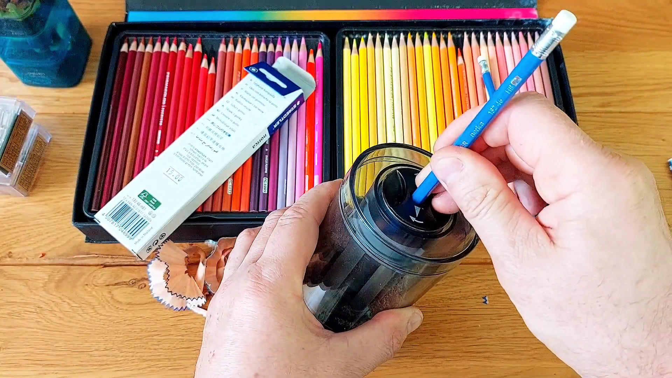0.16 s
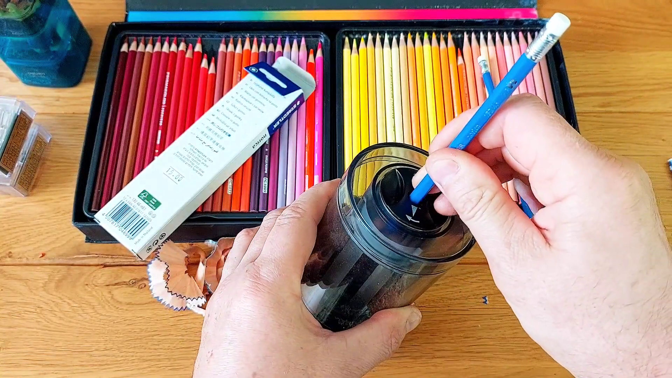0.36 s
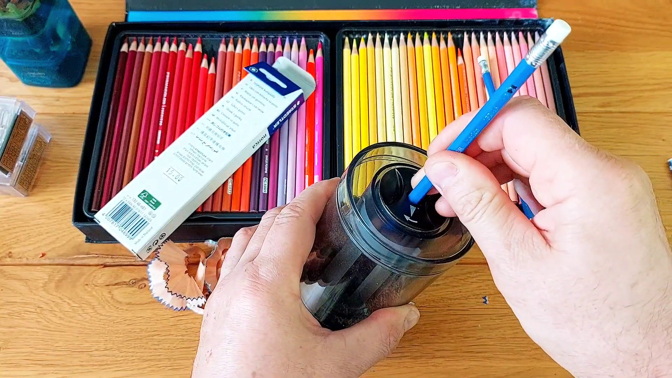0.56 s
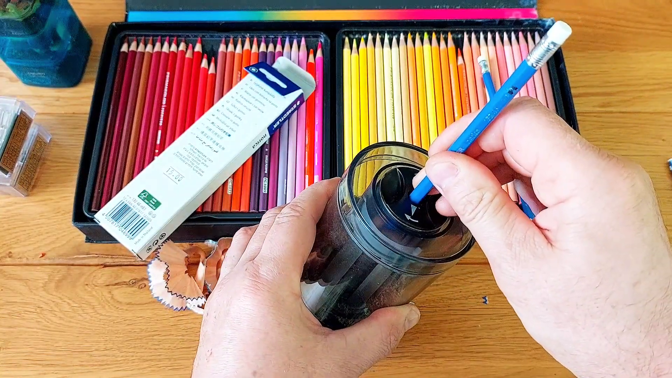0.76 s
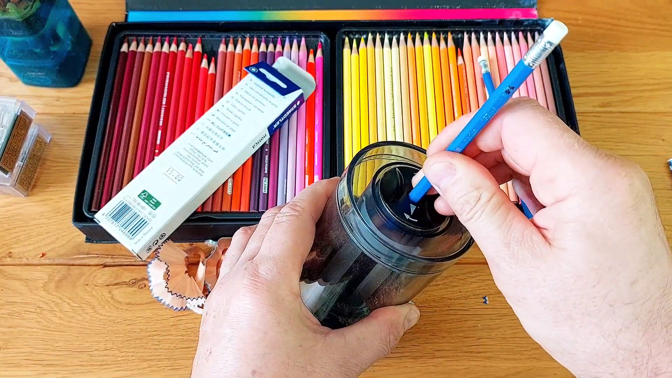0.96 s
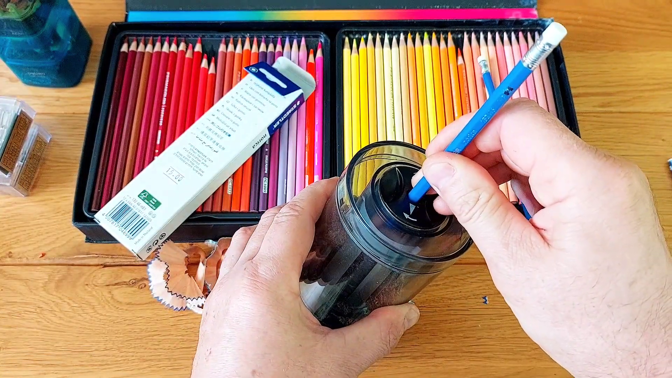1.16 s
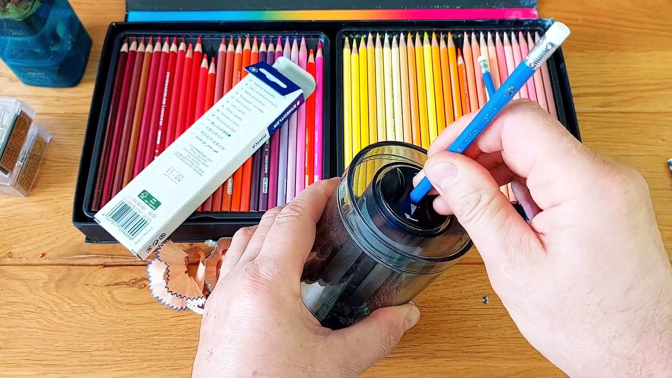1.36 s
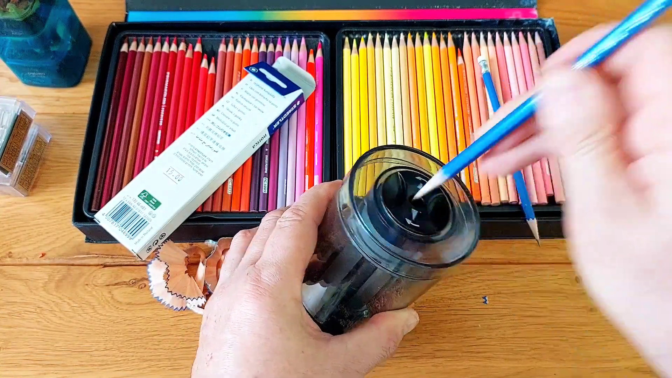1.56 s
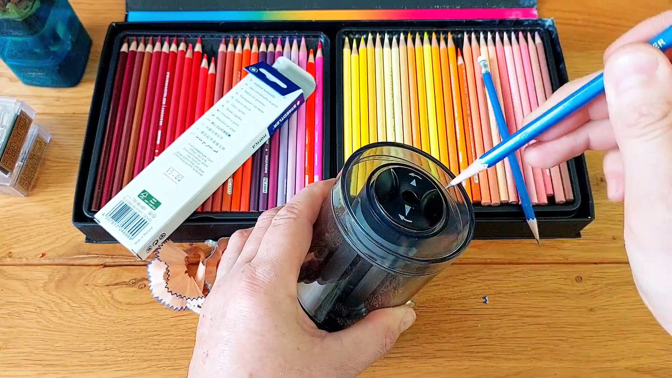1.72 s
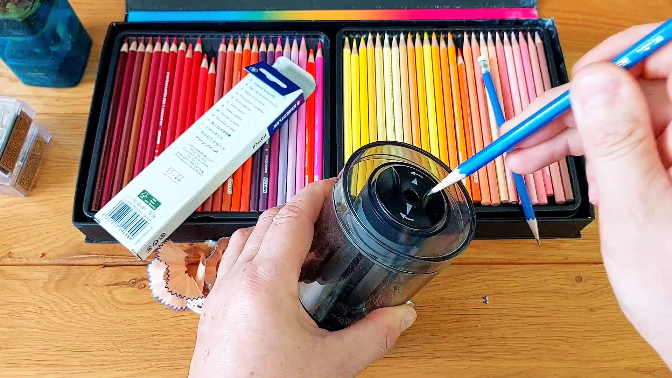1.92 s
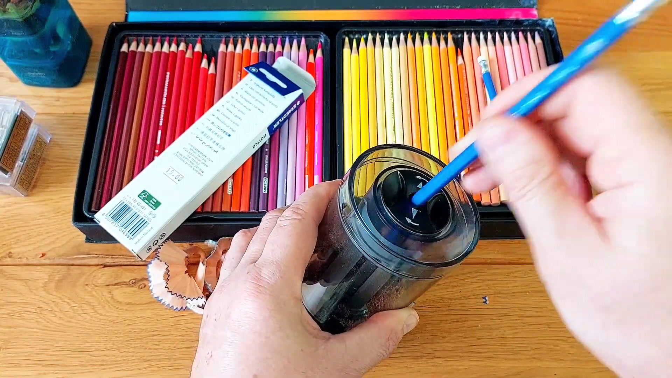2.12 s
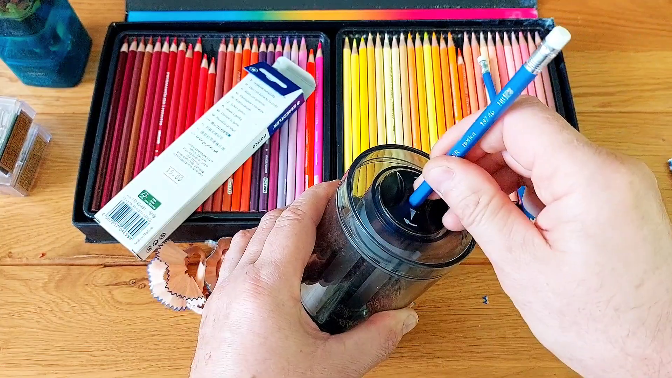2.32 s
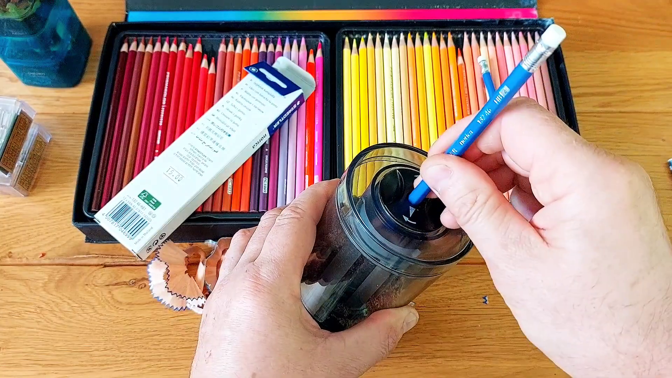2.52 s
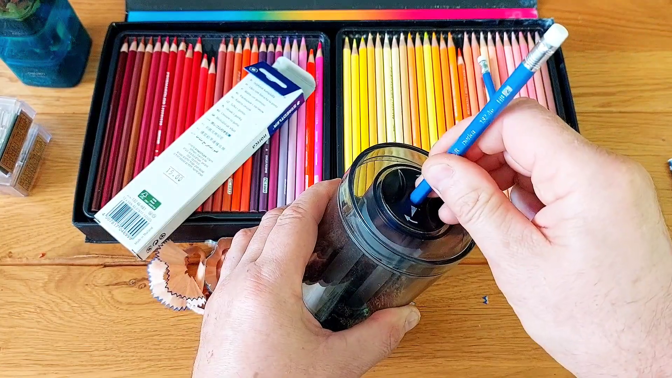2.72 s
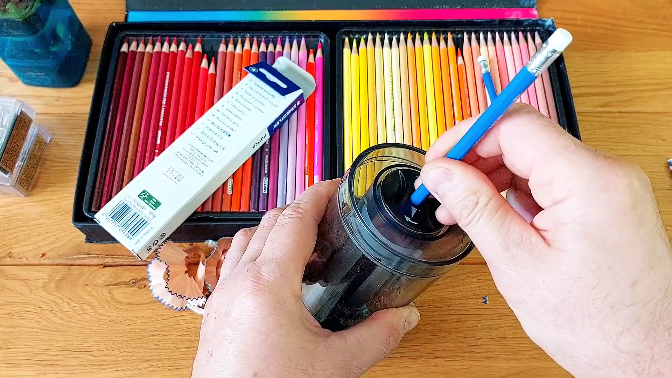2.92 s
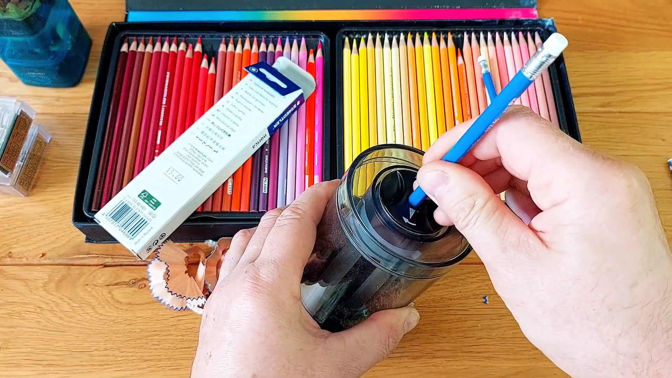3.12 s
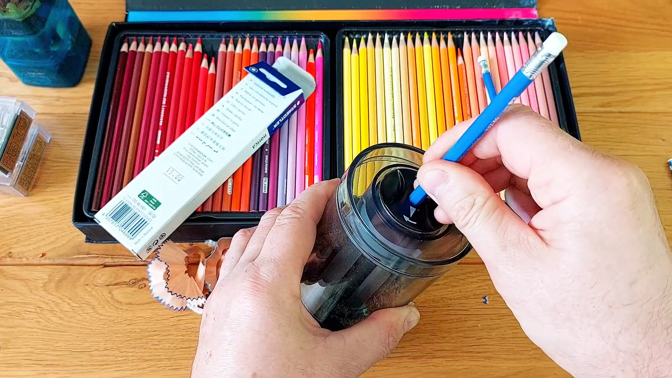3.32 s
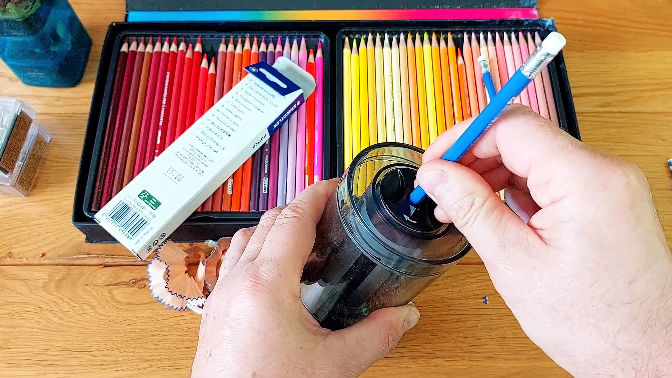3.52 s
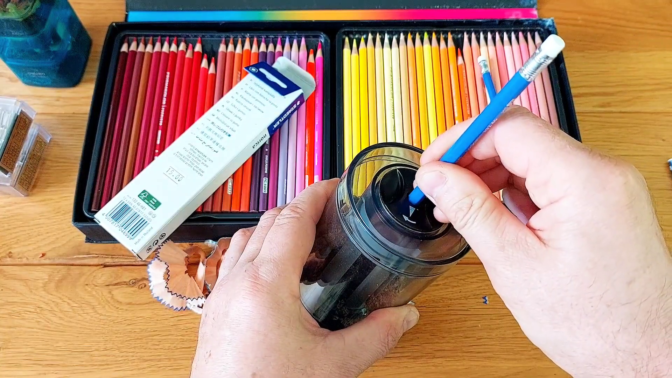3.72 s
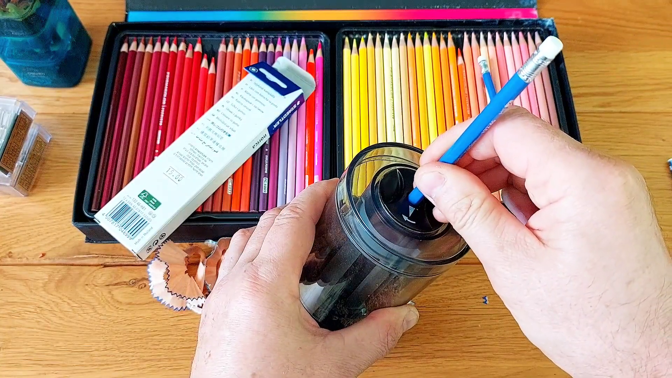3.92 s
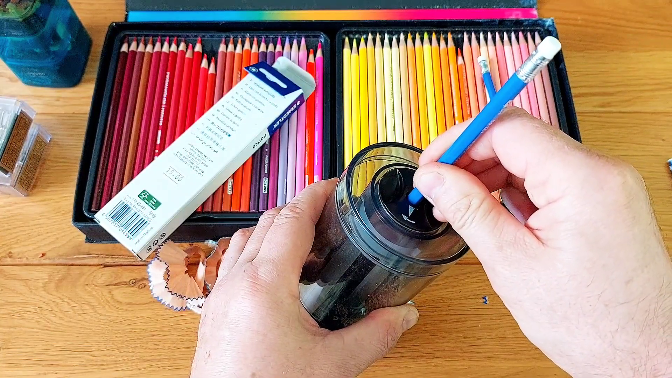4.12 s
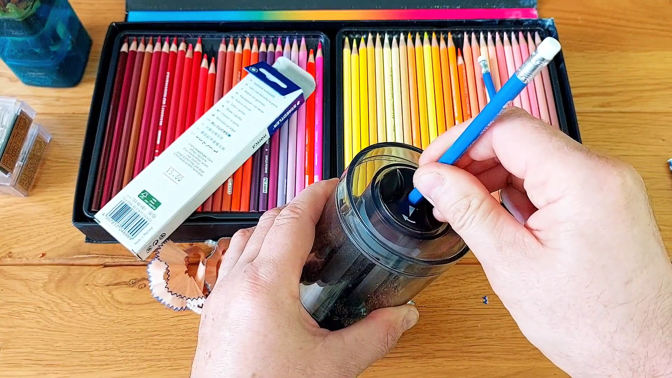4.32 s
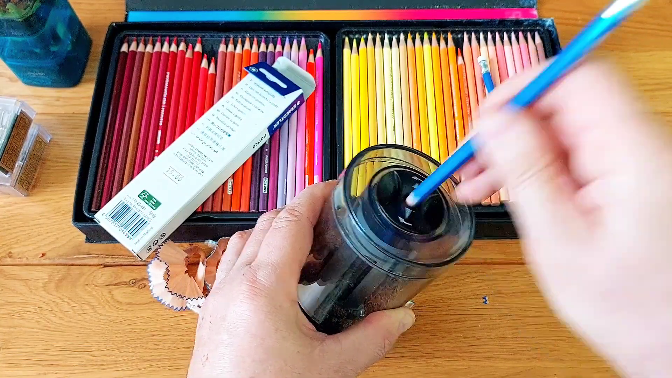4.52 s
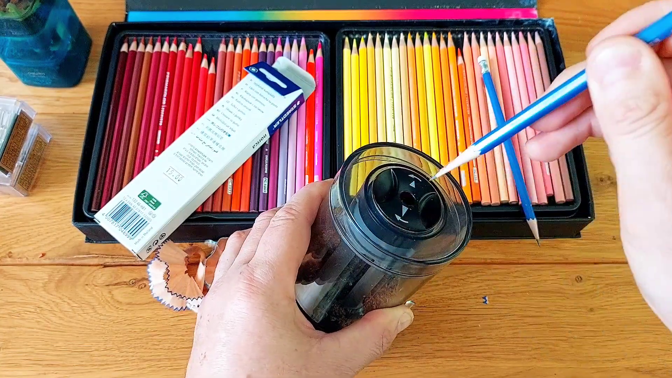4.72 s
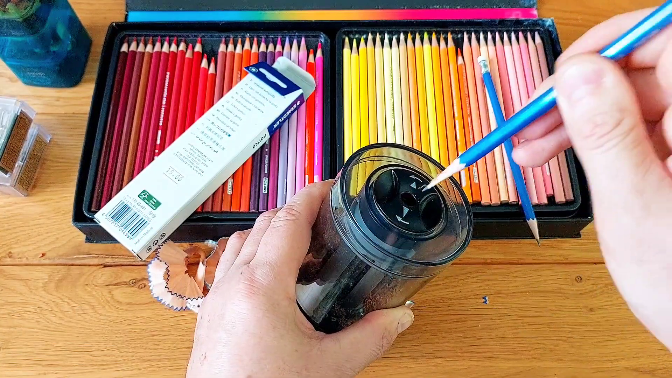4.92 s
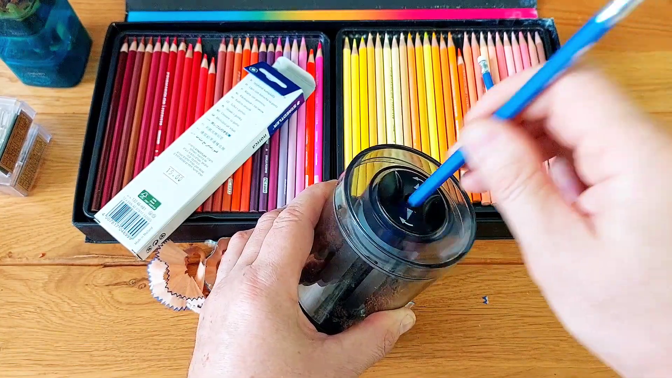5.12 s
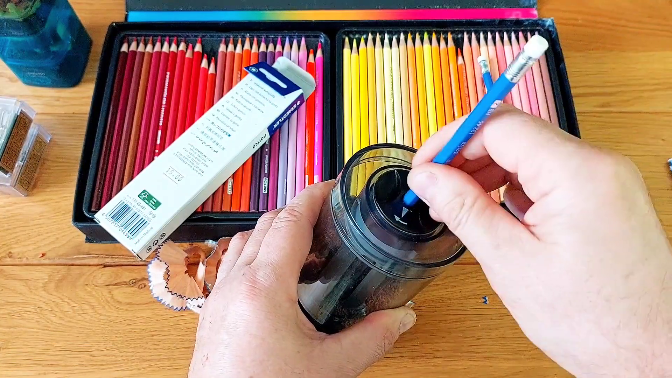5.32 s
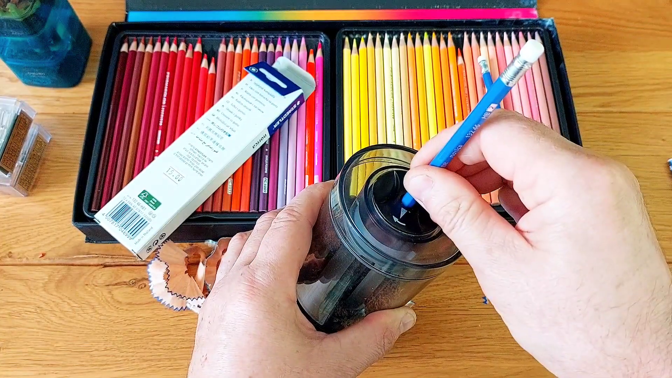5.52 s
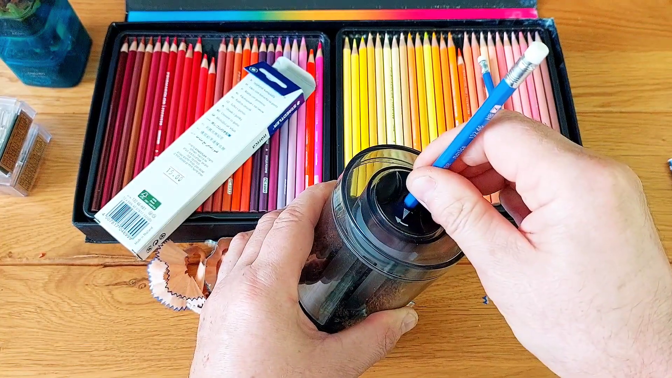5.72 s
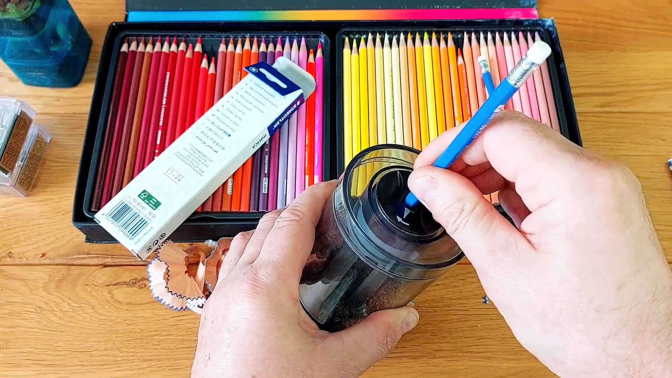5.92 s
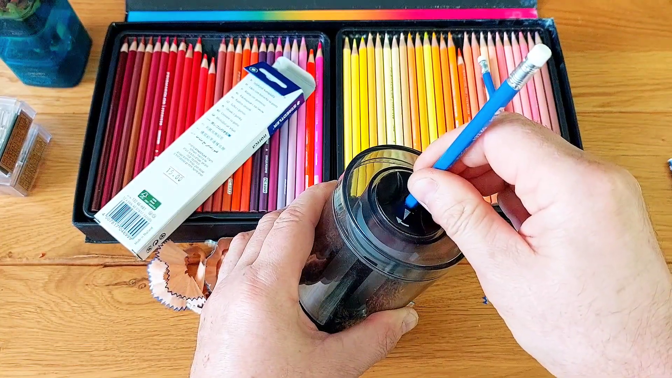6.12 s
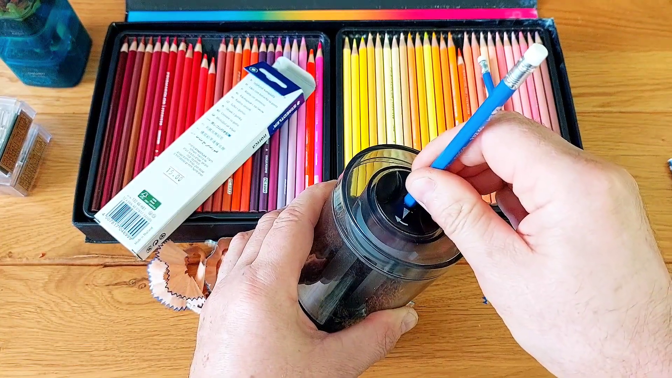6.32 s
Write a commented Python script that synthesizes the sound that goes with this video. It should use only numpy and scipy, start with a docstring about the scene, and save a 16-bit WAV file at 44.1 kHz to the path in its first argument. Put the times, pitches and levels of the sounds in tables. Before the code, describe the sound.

Close up, a motorised pencil sharpener grinds, sags and rattles on a table, stops twice for clicking pencil changes, then grinds again.

```python
"""A small electric sharpener on a wooden table, close to the microphones, takes three pencils.
Its gears whine and sag under load, the cutter rasps the wood once a turn, the housing rattles on the table.
Between the runs, pencils click and scrape in the opening: noise bursts and random slips through resonances.
The tabletop throws back bright copies, a small room answers with a diffuse tail, and a low rumble lies under it."""
import sys
import numpy as np
from scipy import signal
from scipy.fft import rfft, irfft, next_fast_len
from scipy.io import wavfile
from scipy.ndimage import uniform_filter1d, map_coordinates

SR = 44100
rng = np.random.default_rng(int(sys.argv[2]) if len(sys.argv) > 2 else 0)


def file_out(sig):
    """Save sig as 16-bit WAV at sys.argv[1]."""
    # one column per channel
    cols = np.atleast_2d(sig).T
    # limit, then scale
    lim = np.clip(cols, -1, 1)
    pcm = np.round(lim * 32767).astype(np.int16)
    wavfile.write(sys.argv[1], SR, pcm)


N = 284886
TOP_HZ = 15900  # band limit

# one run per pencil: motor on t/s, motor off t/s, unloaded gear tooth rate f/Hz, cutter passes its tight side t/s
RUNS = [(-.3, 1.071, 1980, .546), (2.715, 4.178, 2024, 3.523), (5.872, 7, 1990, 6.324)]
# the hand pushes the pencil deeper: t/s, speed lost/share, half length/s, extra rattle level/dB
PUSHES = [(.292, .072, .038, 1.5), (0.464, .052, .025, 1.5), (0.621, .079, .098, 1.5),
          (.914, .084, .098, 2.5), (2.968, .115, .052, 3), (3.209, .109, .063, 3.5), (3.453, .056, .036, 3),
          (3.516, .059, .07, 0.5), (3.784, .111, .039, 2), (3.881, .043, .056, 1), (4.028, .057, .022, 0),
          (4.102, .127, .063, 2), (5.932, .069, .025, 0.5), (6.057, .24, .062, 8), (6.15, .064, .053, -1),
          (6.335, 0.026, 0.019, -2.5), (6.408, .104, .06, 4.5)]
# pencil touching the sharpener: t/s, then click, knock and bright tick peak level/dB, each before its lift
CONTACTS = [(1.406, -52, -66, -57), (1.422, -36.5, -38.5, -60), (1.479, -29.5, -38, -58),
            (1.488, -27.5, -36, -52), (1.544, -34.5, -46, -42.5), (1.559, -40, -59, -53),
            (1.571, -31.5, -63, -34.5), (1.875, -68, -88, -66), (2.016, -64, -64, -76),
            (2.172, -42, -69, -71), (2.186, -36.5, -41.5, -75), (2.265, -28, -35.5, -55.5),
            (2.302, -24.5, -36, -49), (2.315, -32.5, -36, -72), (2.441, -61, -60, -57),
            (2.595, -57, -66, -65), (4.336, -28, -54, -51), (4.42, -41, -57, -56), (4.449, -38.5, -40, -76),
            (4.486, -31.5, -49, -52), (4.532, -22, -40.5, -43), (4.545, -19, -25.5, -39.5),
            (4.604, -25.5, -40.5, -42), (5.163, -51, -71, -86), (5.193, -32.5, -49, -64),
            (5.257, -29, -45, -49.5), (5.333, -42, -49, -82), (5.385, -53, -59, -60),
            (5.753, -58.5, -67.5, -66)]
# lingering ring of the cup and blade: f/Hz, width/Hz, relative level/dB
HOLLOW = [(208, 28, -3.5), (824, 30, 3), (1590, 18, -0.5), (7900, 48, 0.5)]
# struck plastic: f/Hz, relative level/dB per Hz
CLICK = [(200, -20.5), (620, 2), (850, 4.5), (1300, -3.5), (1650, 2), (2050, 0.5), (2350, 0.5),
         (2650, -2.5), (3100, -1.5), (3700, -3.5), (6000, -9.5), (9000, -32), (16000, -50)]
# dull knock: f/Hz, relative level/dB per Hz
KNOCK = [(40, -29.5), (130, -10.5), (200, -4), (260, -4.5), (350, -9.5), (500, -20.5), (1500, -42)]
# sharp tick: f/Hz, relative level/dB per Hz
TICK = [(2000, -37), (6500, -2.5), (7500, 2), (8800, -10.5), (12000, -5.5), (16000, -10)]


def amp(db):
    """Decibels to gain."""
    return 10 ** (np.asarray(db) / 20)


def unit(x):
    """Scaled to rms 1."""
    return x / np.sqrt(np.mean(x ** 2) + 1e-20)


def along(points, hz):
    """(Hz, value) points read on a log frequency axis."""
    f, v = np.transpose(points)
    return np.interp(np.log(hz + 1), np.log(f + 1), v)


def wobble(rate):
    """A smooth random curve, rate knots a second."""
    knots = rng.standard_normal(int(N * rate / SR) + 4)
    return map_coordinates(knots, [np.arange(N) * rate / SR])


def filtered(x, response):
    """x times a complex response of frequency."""
    n = x.shape[-1]
    m = next_fast_len(n + SR // 4, True)
    return irfft(rfft(x, m) * response(np.fft.rfftfreq(m, 1 / SR)), m)[..., :n]


def coloured(x, spectrum, size=4096):
    """x through a causal, minimum-phase filter of unit energy with the given spectrum."""
    cepstrum = irfft(np.log(amp(along(spectrum, np.fft.rfftfreq(size, 1 / SR)))))
    # folding the cepstrum forward puts the energy as early as it can be
    cepstrum[1:size // 2] *= 2
    cepstrum[size // 2 + 1:] = 0
    ring = irfft(np.exp(rfft(cepstrum)))
    return signal.fftconvolve(x, ring[None] / np.linalg.norm(ring), axes=1)[:, :x.shape[1]]


def resonate(x, modes):
    """x through (Hz, width Hz, dB) resonances of alternating sign."""
    def response(f):
        total = 0
        for k, (centre, width, db) in enumerate(modes):
            damping = 1j * f * width
            total = total + (-1) ** k * amp(db) * damping / (centre * centre - f * f + damping)
        return total
    return filtered(x, response)


def grains(rate, scatter_db):
    """Random tiny impulses of uneven size, rate a second, on two paths, rms 1."""
    chance = rng.random(N)
    size = amp(scatter_db * rng.standard_normal(N))
    return unit((chance < rate / SR) * size * rng.standard_normal((2, N)))


def push(t, s, length_s):
    """The bell-shaped swell of one push."""
    return np.exp(-((t - s) / length_s) ** 2)


def motor():
    """Gear tooth rate in Hz: spin-up, a sag at every push and every orbit, then coasting down."""
    # the motor catches short of its speed by this share, spins up, and coasts down after the switch opens
    start_lack, spin_up_s, spin_down_s = .45, .086, .135
    # the cutter orbits the pencil about twelve times a second and drags once on every orbit
    teeth_per_orbit, orbit_sag = 159.3, .032
    t = np.arange(N) / SR
    load = sum(share * push(t, s, length_s) for s, share, length_s, _ in PUSHES)
    mesh_hz = np.zeros(N)
    for on, off, free_hz, tight_s in RUNS:
        spin_up = 1 - start_lack * np.exp(-(np.maximum(t - on, 0) / spin_up_s) ** 2)
        spin_down = np.exp(-np.maximum(t - off, 0) / spin_down_s)
        hz = free_hz * spin_up * spin_down * (1 - load)
        orbits = np.cumsum(hz) / SR / teeth_per_orbit
        drag = orbit_sag * np.cos(2 * np.pi * (orbits - np.interp(tight_s, t, orbits)))
        mesh_hz = np.where(t >= on, hz * (1 - drag), mesh_hz)
    return np.maximum(mesh_hz, 1)


def running(attack_s, release_s, coast_db):
    """Gain of the runs: attack, hold, a quick release as the pencil leaves, and a quiet spell of coasting."""
    # the emptied cutter spins on for a moment, then fades
    coast_s, coast_db_per_s = 0.14, 252
    t = np.arange(N) / SR
    total = np.zeros(N)
    for on, off, *_ in RUNS:
        since_on = np.maximum(t - on, 0)
        since_off = np.maximum(t - off, 0)
        attack = 1 - np.exp(-(since_on / attack_s) ** 1.67)
        release = np.exp(-(since_off / release_s) ** 3)
        coast = amp(coast_db - coast_db_per_s * np.maximum(since_off - coast_s, 0))
        total += attack * np.maximum(release, coast)
    return total


def rasp(turns, bite_db, flutter_db, ring_db):
    """Wood fibres snap in a clump at each pass of the cutter; the steel blade rings with each bite."""
    # plastic shell and shavings cup: f/Hz, relative level/dB per Hz
    shell = [(300, -25), (800, -8), (1250, -9.5), (1600, -2), (2000, -3.5), (2500, -1), (3200, -11),
             (3850, -4), (4600, -5), (5100, -5.5), (5650, 0.5), (6900, -13.5), (7600, -10), (8500, -16),
             (10500, -13), (15500, -17)]
    # steel blade: f/Hz, relative level/dB per Hz
    blade = [(1000, -46.5), (5100, -19.5), (5850, 4), (6800, -19), (7600, -1.5), (8400, -21),
             (15000, -25.5)]
    bite = np.cos(2 * np.pi * turns + .8 * wobble(20))
    flutter = amp(flutter_db * wobble(200))
    snaps = flutter * amp(bite_db * bite) * grains(rate=22000, scatter_db=0.76)
    strikes = flutter * amp(6.6 * bite) * grains(rate=13000, scatter_db=2.5)
    wood = coloured(unit(snaps), shell)
    steel = coloured(unit(strikes), blade)
    return unit(wood + amp(ring_db) * steel)


def partial(phase, db, waver_db):
    """One rough gear tone, reaching the two paths a quarter cycle apart."""
    swell = amp(db + waver_db * wobble(60) + 1.5 * wobble(300))
    return swell * np.array([np.sin(phase + .6 * wobble(45) + lag) for lag in (0, np.pi / 2)])


def whine(teeth, mesh_hz, jitter, waver_db, beat_db):
    """Meshing teeth: harmonics with uneven timing, which flare as they cross the gearbox's resonances."""
    # how strongly the gearbox radiates a tone: f/Hz, relative level/dB
    gearbox = [(1050, -38), (1250, -5), (1550, -6.5), (1780, -13), (2040, -6), (2350, -14.5), (2900, -4.5),
               (3300, -24.5), (3650, -11.5), (4020, -4), (4450, -26), (5200, -14.5), (5600, -9.5),
               (6300, -19), (8200, -25.5)]
    phase = 2 * np.pi * teeth + jitter * wobble(220)  # jitter in radians
    tone = sum(partial(k * phase, along(gearbox, k * mesh_hz), waver_db) for k in range(1, 5))
    # off-centre gears add weaker tones just under the tooth rate
    for ratio in (5 / 6, 9 / 10):
        tone += partial(ratio * phase, along(gearbox, mesh_hz) + beat_db, waver_db)
    return tone


def rattle(turns, throb_db):
    """Play in the gears knocks the housing against the table, with a slight throb every few turns."""
    # housing standing on the table: f/Hz, width/Hz, relative level/dB
    body = [(104.1, 13, -1.5), (169.7, 21, 0), (203.3, 30, 1), (266, 40, -3.5), (309.2, 30, -0.5),
            (347, 27, -2), (399.5, 32, 0), (432, 33, -1.5), (492, 36, -6), (598.6, 29, -4.5),
            (660, 29, -5.5), (925, 130, -12.5)]
    throb = amp(throb_db * np.sin(2 * np.pi * turns / 8.4))
    knocks = grains(rate=2500, scatter_db=-0.5) * throb
    skirt = [(25, -8), (90, 3), (900, -0.5), (2500, -20.5)]  # f/Hz, relative level/dB
    return unit(coloured(resonate(knocks, body), skirt))


def sharpener():
    """The motor speed times the whine, the cutter and the rattle."""
    teeth_per_turn = 41
    cut_db, gear_db, rattle_db = -25, -22.5, -31  # before braking, pushes and wobble
    shake_lead_s = .022  # the housing shakes just before the motor has slowed
    t = np.arange(N) / SR
    mesh_hz = motor()
    teeth = np.cumsum(mesh_hz) / SR
    turns = teeth / teeth_per_turn
    # under power, a deep bite brakes the motor and makes cutter, gears and housing louder
    powered = sum((t > on) & (t < off) for on, off, *_ in RUNS)
    slowing = -np.gradient(np.log(mesh_hz)) * SR * powered
    braking = np.tanh(uniform_filter1d(slowing, size=900))

    cutter = amp(cut_db + 0.75 * braking) * rasp(turns, bite_db=0.6, flutter_db=1.67, ring_db=-7.0)
    # a slow cutter only rubs, and loses its top
    slow = np.clip((1500 - mesh_hz) / 500, 0, 1)
    dull = filtered(cutter, lambda hz: 1 / (1 + (hz / 9000) ** 4))
    cutter += slow * (dull - cutter)

    gears = whine(teeth, mesh_hz, jitter=0.43, waver_db=3.5, beat_db=-13.0)
    gears = amp(gear_db + 0.8 * braking) * gears

    pushed_db = sum(db * push(t + shake_lead_s, s, length_s) for s, _, length_s, db in PUSHES)
    housing_db = rattle_db + pushed_db + 0.83 * braking + 1.5 * wobble(18)
    housing = amp(housing_db) * rattle(turns, throb_db=0.07)
    return (cutter * running(attack_s=0.03, release_s=0.086, coast_db=-16)
            + gears * running(attack_s=0.038, release_s=.055, coast_db=-28)
            + housing * running(attack_s=0.054, release_s=.09, coast_db=-18.5))


def tabletop(x, count=8):
    """The table and the things on it throw back weak, bright copies within a few milliseconds."""
    delays = rng.uniform(.001, .009, (count, 2))  # seconds
    copies = np.array([sum(np.pad(path, (round(d * SR), 0))[:N] for d in path_delays)
                       for path, path_delays in zip(x, delays.T)])
    return filtered(copies / np.sqrt(count), lambda hz: hz ** 2 / (hz ** 2 + 2500 ** 2))


def room(x):
    """A diffuse tail in which each frequency dies at its own speed."""
    # time to fall by 60 dB: f/Hz, t60/s
    decay = [(200, 0.25), (1500, 0.28), (5000, 0.14), (14000, 0.19)]
    hz, t, z = signal.stft(rng.standard_normal((2, SR // 2)), SR, nperseg=256)
    fade = amp(-60 * t / along(decay, hz)[:, None])
    tail = signal.istft(z * fade, SR, nperseg=256)[1]
    # the tail sets in 5 ms after the direct sound
    tail = np.pad(tail / np.linalg.norm(tail[0]), ((0, 0), (round(.005 * SR), 0)))
    return signal.fftconvolve(x, tail, axes=1)[:, :N]


def hush():
    """Low rumble that swells and sinks unevenly, at times abruptly, under a faint, nearly steady hiss."""
    # the rumble's course, before its wobble and trim: t/s, level/dB
    rumble_course = [(0.0, -59), (1.1, -51.5), (1.44, -64), (1.55, -51), (1.99, -73), (2.95, -59),
                     (5.59, -71), (6.03, -56), (6.46, -59)]
    # the room at rest: f/Hz, relative level/dB per Hz
    rest_spectrum = [(20, -12.5), (58, 3), (100, -3.5), (200, -12.5), (400, -23.5), (1000, -31),
                     (3000, -39), (8000, -36.5), (16000, -38)]
    rumble_spectrum = [(20, -9), (42, -8.0), (57, 6.5), (80, -8.0), (110, -17.5), (200, -24.5),
                       (600, -58.0)]  # f/Hz, relative level/dB per Hz
    s, db = np.transpose(rumble_course)
    rumble_gain = amp(np.interp(np.arange(N) / SR, s, db) + 2.7 * wobble(12))
    rumble = amp(-1.0) * rumble_gain * coloured(rng.standard_normal((2, N)), rumble_spectrum)
    hiss_gain = amp(-71.0 + 0.74 * wobble(5.3))
    return rumble + hiss_gain * coloured(rng.standard_normal((2, N)), rest_spectrum)


def taps(levels, edges_hz, spectrum, t60, lift_db):
    """A short dying burst at every contact, heard through one response of the sharpener up to an edge."""
    t = np.arange(SR // 4) / SR
    out = np.zeros((2, N + SR))
    for (s, *_), db, edge_hz in zip(CONTACTS, levels, edges_hz):
        burst = coloured(rng.standard_normal((2, len(t))) * amp(-60 * t / t60), spectrum)
        lowpass = signal.butter(2, min(edge_hz, TOP_HZ), fs=SR, output="sos")
        burst = signal.sosfilt(lowpass, burst)
        peak = np.abs(burst).max(axis=1, keepdims=True)
        out[:, round(s * SR):][:, :len(t)] += amp(db + lift_db) * burst / peak
    return out[:, :N]


def contacts():
    """Pencils click on the rim and knock the housing."""
    _, click_db, knock_db, tick_db = np.transpose(CONTACTS)
    # a soft touch, with little tick in it, rings only the lower modes
    soft_hz = np.clip(4500 * 2 ** ((tick_db - click_db + 26.0) / 9), 2200, 14000)
    full_hz = np.full(len(CONTACTS), TOP_HZ)
    clicks = taps(click_db, soft_hz, CLICK, t60=0.055, lift_db=-4.5)
    knocks = taps(knock_db, full_hz, KNOCK, t60=.15, lift_db=1.0)
    ticks = taps(tick_db, full_hz, TICK, t60=0.025, lift_db=11.0)
    return clicks + knocks + ticks


def strokes():
    """Gains of scrape, hiss, judder and ring: every stroke swells to its peak and fades."""
    # wood sliding in the opening: peak t/s, rise by 20 dB/s, fall by 20 dB/s,
    # then scrape, hiss, judder and hollow ring level/dB, each before its trim in the mix
    # (rise and fall are the seconds that a change of 20 dB takes)
    slides = [(1.49, 0.022, 0.045, -44.5, -52, -52, -62), (1.57, 0.091, 0.08, -54.5, -44, -48.5, -66),
              (2.04, .02, .4, -80, -78, -66, -70), (2.2, 0.053, .15, -54, -70, -45.5, -60),
              (2.31, 0.044, 0.053, -41, -58, -36, -58), (2.42, .1, .35, -76, -84, -56, -67),
              (4.549, .03, 0.081, -35.5, -32.5, -32, -55), (5.22, 0.056, 0.048, -55, -44, -44.5, -60),
              (5.275, 0.069, .16, -59.5, -76.5, -43.5, -72)]
    t = np.arange(N) / SR
    total = 0
    for s, rise_s, fall_s, *levels in slides:
        envelope = amp(-20 * np.maximum((s - t) / rise_s, (t - s) / fall_s))
        total = total + np.outer(amp(levels), envelope)
    return total


def sliding():
    """Wood sticks and slips on the plastic: a scrape, a fine hiss, a judder of the housing and a hollow ring."""
    # a scrape weaker than this only rings the modes under the edge
    firm_scrape_db, soft_edge_hz = -47, 3100
    scrape, hiss, judder, ring = strokes()
    slips = grains(rate=2200, scatter_db=-0.5)
    firm = scrape ** 2 / (scrape ** 2 + amp(firm_scrape_db) ** 2)
    soft = filtered(slips, lambda hz: 1 / (1 + (hz / soft_edge_hz) ** 10))
    scraping = coloured(scrape * (soft + firm * (slips - soft)), CLICK)
    hissing = coloured(hiss * slips, TICK)
    juddering = coloured(judder * slips, KNOCK)
    ringing = ring * unit(resonate(soft, HOLLOW))
    return amp(-4.5) * scraping + amp(-12) * hissing + amp(-7.5) * juddering + amp(-13) * ringing


def handling():
    """Between the runs every touch also leaves the hollow sharpener ringing faintly."""
    touch = contacts() + sliding()
    return touch + amp(1.5) * resonate(touch, HOLLOW)  # the ring outlasts the touch


def spread(pair):
    """Two unrelated signals to left and right: alike in the bass, apart in the treble."""
    # left-right likeness: f/Hz, correlation
    alike = [(100, 0.96), (300, 0.94), (700, .82), (1400, 0.66), (2800, 0.027), (5500, 0.29), (9000, -.1),
             (14000, -0.11)]

    def mid_side(hz):
        turn = np.arccos(np.clip(along(alike, hz), -1, 1)) / 2
        return np.array([np.cos(turn), np.sin(turn)])
    mid, side = filtered(pair, mid_side)
    return np.array([mid + side, mid - side])


def scene():
    """The sharpener near the microphones, leaning to one side or the other by frequency."""
    # left minus right: f/Hz, level/dB
    lean = [(200, 0), (1600, 1), (3300, 0.5), (3850, 5.5), (4600, -6), (5500, 4.5), (6800, 0.5), (7650, -7),
            (8600, -0.5), (10500, -5), (15000, -1)]
    near = sharpener() + handling()
    pair = spread(near + amp(-9.5) * tabletop(near) + amp(-13.0) * room(near) + hush())
    return filtered(pair, lambda hz: amp(np.outer([.5, -.5], along(lean, hz))))


def record(dry):
    """A very steep low-pass leaves next to nothing above the band limit."""
    return filtered(dry, lambda hz: 1 / np.sqrt(1 + (hz / TOP_HZ) ** 200))


dry = scene()
out = record(dry)
file_out(out)
```